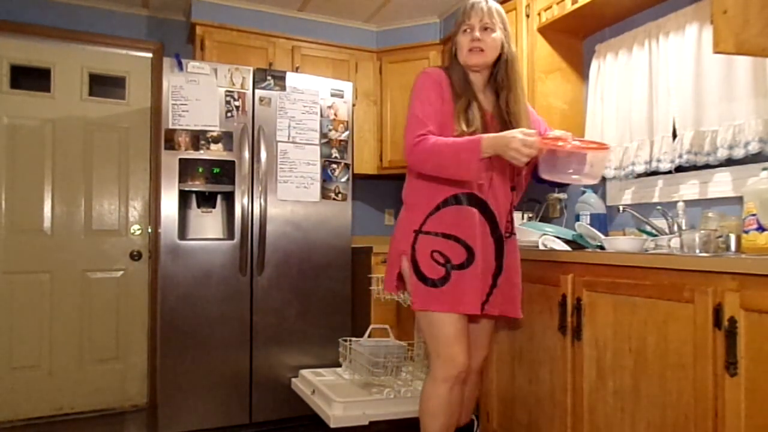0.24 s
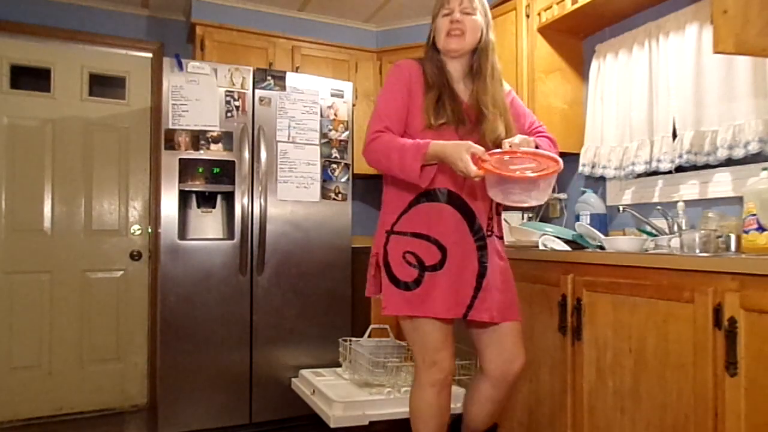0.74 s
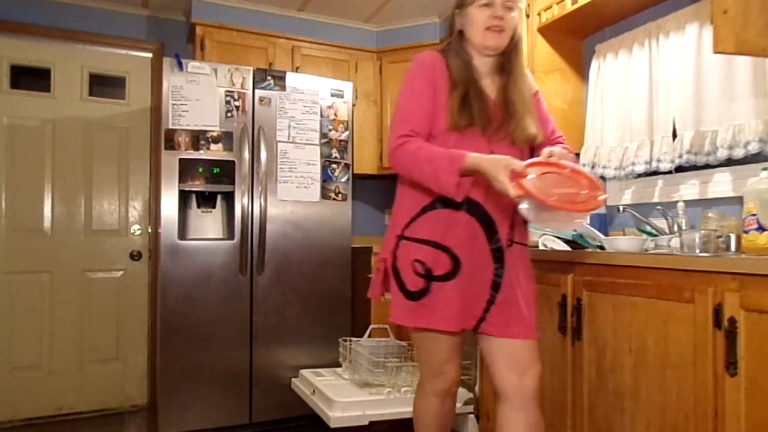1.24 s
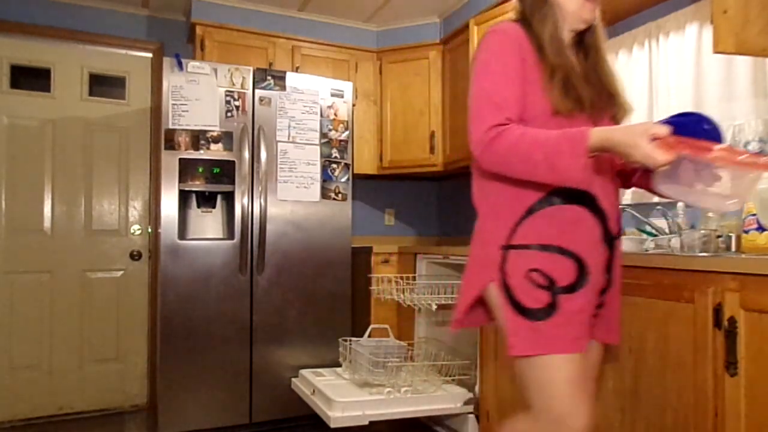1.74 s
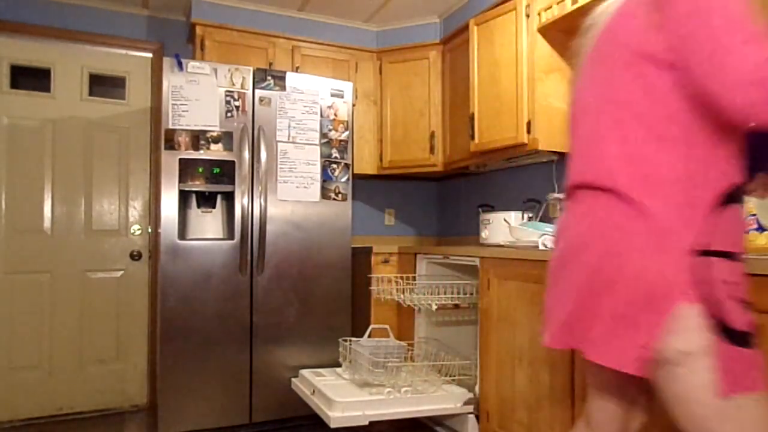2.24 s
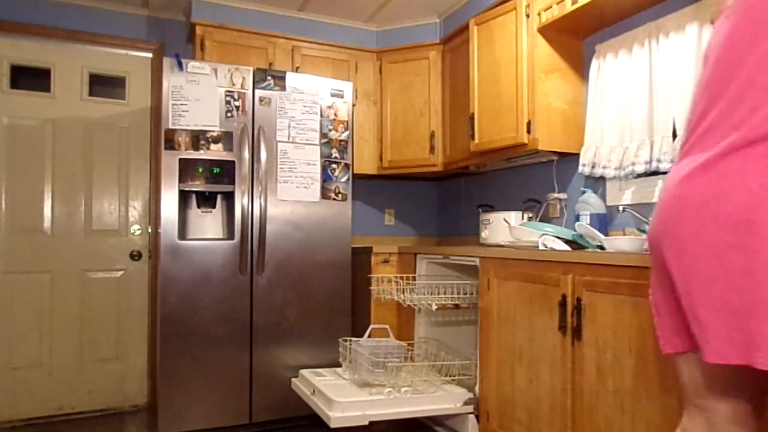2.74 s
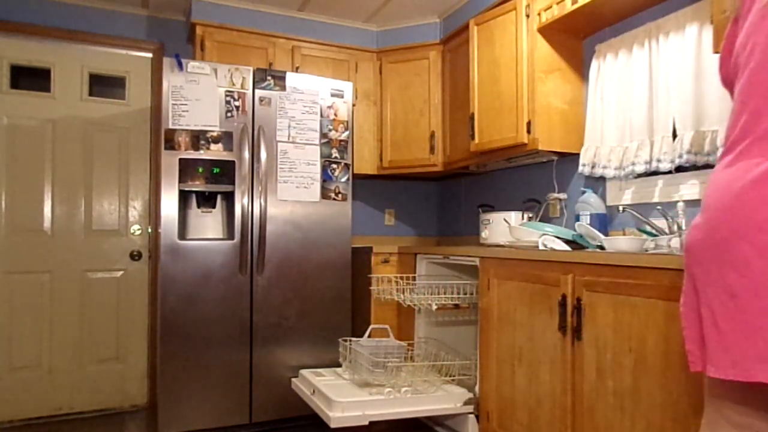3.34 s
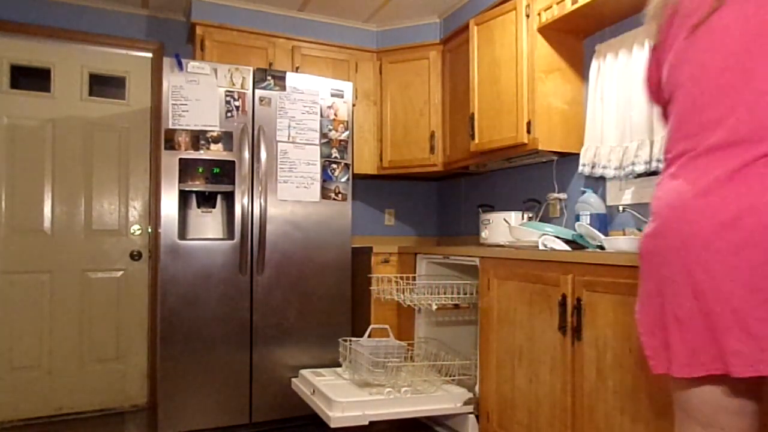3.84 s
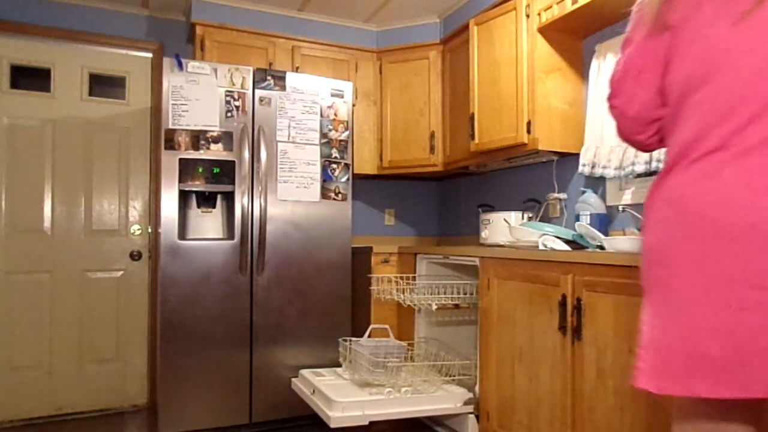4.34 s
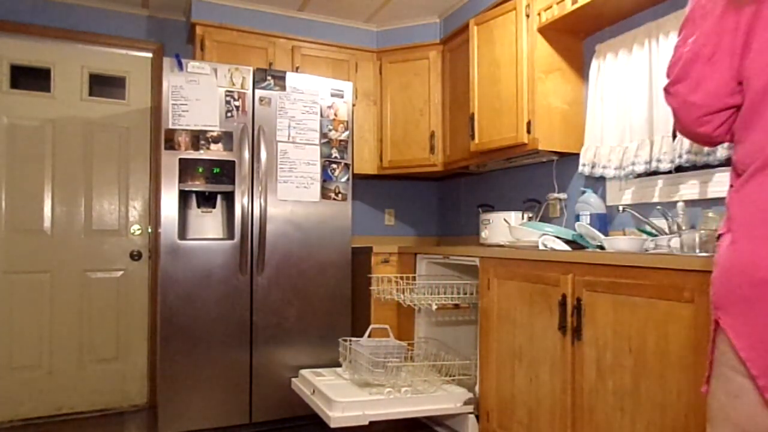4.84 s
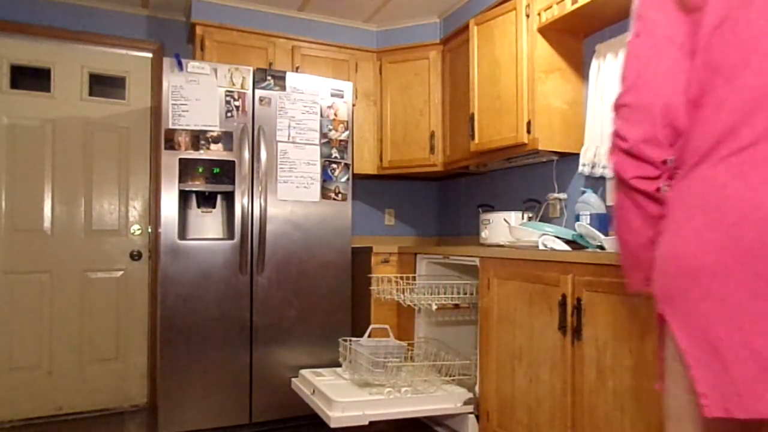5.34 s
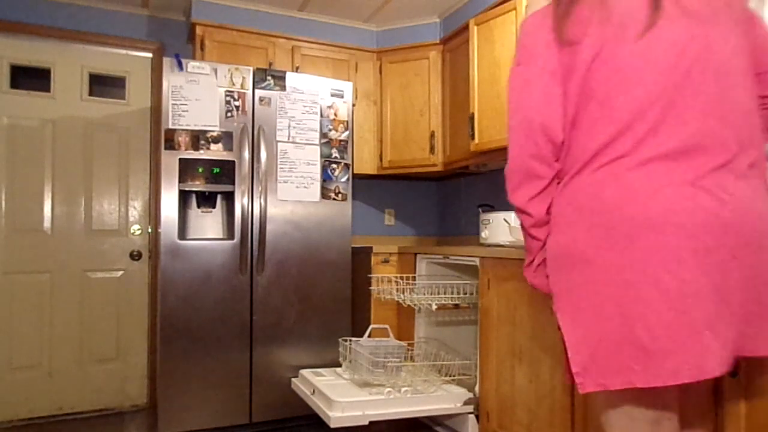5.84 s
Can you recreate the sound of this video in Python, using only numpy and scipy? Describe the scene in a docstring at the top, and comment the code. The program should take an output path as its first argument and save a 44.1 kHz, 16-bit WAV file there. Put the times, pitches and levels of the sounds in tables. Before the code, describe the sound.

Hollow plastic clatter and dull footsteps over appliance hum, a loud stacking thump, brief rattle, and two cupboard slams that leave glasses ringing.

```python
"""Plastic tubs and lids knock, rub, rattle and are stacked, amid footsteps and a latch pull; a wooden
cupboard door slams twice and glasses ring on. Behind is a steady appliance hum; the walls answer. Blows
are decaying noise bursts through resonances; glasses, thuds and door panel are decaying sines; rubs and
hum are shaped noise. A dull microphone picks it up, with preamplifier hiss and treble notches."""
import sys
import numpy as np
from scipy import signal
from scipy.fft import rfft, irfft, next_fast_len
from scipy.io import wavfile
from scipy.ndimage import uniform_filter1d, map_coordinates

SR = 44100
rng = np.random.default_rng(int(sys.argv[2]) if len(sys.argv) > 2 else 0)


def output_pcm(signal):
    """Save a mono or channel-first signal as 16-bit PCM at the path in sys.argv[1].

    Samples are clipped to [-1, 1] before scaling.
    """
    pcm = np.clip(np.atleast_2d(signal).T, -1, 1) * 32767
    wavfile.write(sys.argv[1], SR, np.round(pcm).astype(np.int16))


def volts_from_db(level):
    """Convert decibel levels to linear amplitude ratios."""
    exponent = np.asarray(level, float) / 20
    return 10 ** exponent


N = 268304

# The door meets its frame. Each row: time in seconds, blow level in dB, clack over body in dB,
# click over body in dB, body t60 in seconds.
DOOR_SLAMS = [(5.313, -1, -5.5, -2.5, 0.057), (5.579, -8.5, -3.5, -8, 0.036)]


def unit(x):
    """Scaled to rms 1."""
    return x / np.sqrt(np.mean(x ** 2) + 1e-20)


def along(points, hz):
    """(Hz, value) points read on a log frequency axis."""
    point_hz, value = np.transpose(points)
    return np.interp(np.log(hz + 1), np.log(point_hz + 1), value)


def filtered(x, response):
    """x times a complex response of frequency."""
    size = next_fast_len(x.shape[-1] + 8192)  # room for the filter to ring out
    spectrum = rfft(x, size) * response(np.fft.rfftfreq(size, 1 / SR))
    return irfft(spectrum, size)[..., :x.shape[-1]]


def band(f, hz, width_hz):
    """One causal resonance, gain 1 at its centre."""
    return 1j * f * width_hz / (hz * hz - f * f + 1j * f * width_hz)


def modes(f, table):
    """Resonances side by side, with alternating sign."""
    total = 0
    for k, (hz, width_hz, db) in enumerate(table):
        total = total + (-1) ** k * volts_from_db(db) * band(f, hz, abs(width_hz) + 1)
    return total


def add(out, start_s, x):
    """Mixes x in from a time that may lie before the start."""
    start = round(start_s * SR)
    x = x[max(-start, 0):]
    out[max(start, 0):][:len(x)] += x


def tail(length):
    """A new reverberant tail of energy 1, each frequency dying at its own speed."""
    # Wall reverberation. Each row: frequency in Hz, t60 in seconds.
    wall_t60 = [(80, 0.4), (300, 0.38), (1000, 0.32), (4000, 0.34), (8000, 0.22), (15000, 0.2)]
    hz, t, z = signal.stft(rng.standard_normal(length + 256), SR, nperseg=256)
    decay = volts_from_db(-60 * t / along(wall_t60, hz)[:, None])
    echo = signal.istft(z * decay, SR, nperseg=256)[1][:length]
    echo = echo * (1 - np.exp(-np.arange(length) / SR / 0.0046))
    return echo / np.linalg.norm(echo)


def walls(x, wet_db):
    """The sound with the answer of the walls."""
    return x + volts_from_db(wet_db) * signal.fftconvolve(x, tail(SR // 2))[:len(x)]


def blow(body, clack, clack_db, click_db, t60_s, rise_s):
    """A rattling contact drives the body's modes, a hard clack and a bright click; peak near 1."""
    crest_db = 16  # peak of a blow over the rms of its body sound
    t = np.arange(SR * 2 // 3) / SR
    click = lambda f: band(f, 2930, 5400) ** 2 + 0.29 * band(f, 7700, 7700)
    out, echo = np.zeros(len(t)), tail(len(t))
    parts = [(body, 0, t60_s), (clack, clack_db, 1.37 * t60_s), (click, click_db, 1.64 * t60_s)]
    for colour, db, life_s in parts:
        envelope = (1 - np.exp(-t / rise_s)) ** 2 * volts_from_db(-60 * t / life_s)
        near = filtered(rng.standard_normal(len(t)) * envelope, colour)
        near = near / np.sqrt(np.mean(near[:SR // 50] ** 2))
        # the walls return the same colour, blurred
        far = unit(filtered(echo, colour)) * (1 - np.exp(-t / (0.19 * life_s)))
        far = volts_from_db(-0.5) * np.sqrt(np.mean(near ** 2)) * far
        out += volts_from_db(db - crest_db) * (near + far)
    return out


def knocks():
    """Knocks of tubs and lids, with the latch pull and footsteps: each has a low hollow note and a harder
    upper note."""
    # Each row: time in seconds, blow level in dB, hollow note in Hz, upper note in Hz,
    # upper over hollow in dB.
    contacts = [(-0.004, -19, 558, 1360, -3), (0.056, -20, 600, 1420, -8), (0.089, -40.5, 540, 1350, 9),
                (0.312, -40, 620, 2300, -2), (0.521, -37.5, 600, 1300, 2), (0.654, -45.5, 810, 1350, 4.5),
                (0.677, -40, 318, 3150, 7), (1.231, -40, 433, 1260, 4), (2.091, -40.5, 1650, 3780, 9.5),
                (2.111, -28, 583, 1490, -15.5), (2.282, -41, 605, 1010, -3), (2.457, -44, 579, 2200, 12),
                (2.613, -29.5, 328, 1030, -12), (2.659, -39, 600, 1110, -14.5),
                (2.733, -22.5, 366, 1380, 8), (2.757, -20.5, 632, 1310, -21), (2.889, -38.5, 596, 1240, 0),
                (2.934, -41, 385, 1350, 1.5), (2.969, -36, 380, 1010, -1.5), (3.321, -41.5, 1070, 2980, 9),
                (3.546, -49.5, 810, 2430, 15.5), (3.563, -28, 936, 1610, 9),
                (3.572, -34.5, 1020, 2920, 3.5), (3.796, -31, 804, 2510, 8), (3.806, -32.5, 650, 1020, 0.5),
                (4.201, -46.5, 630, 2340, 10), (4.609, -39, 780, 2050, 8.5), (4.644, -28.5, 1200, 2130, 4),
                (4.678, -29, 473, 1530, 12.5), (4.784, -36.5, 430, 1230, 7.5), (4.899, -43, 790, 1240, -13),
                (5.015, -35, 696, 2460, 5), (5.039, -37.5, 308, 1770, 5), (6.055, -31.5, 318, 1130, -15)]
    # Bright click, duller near and inside the cupboard. Each row: time in seconds, dB over the hollow
    # note before the upper note's share.
    click_course = [(0, 5), (0.35, -8), (0.68, 2), (2.1, 5), (2.45, -8), (2.9, -20), (3.55, -8), (3.8, -22),
                    (4.6, -36), (5.05, -52), (6.05, -1.5)]
    click_follows_upper = 0.41  # dB per dB: a stronger upper note brings more click
    out = np.zeros(N + SR)
    for s, db, hollow_hz, upper_hz, upper_db in contacts + rattle():
        body = lambda f: (band(f, hollow_hz, 0.14 * hollow_hz)
                          + 0.3 * band(f, 0.82 * hollow_hz, 1.1 * hollow_hz) ** 2)
        upper = lambda f: band(f, upper_hz, 0.085 * upper_hz) + 0.35 * band(f, 1990, 1520) ** 2
        click_db = np.interp(s, *np.transpose(click_course)) + click_follows_upper * upper_db
        add(out, s - .003, volts_from_db(db) * blow(body, upper, upper_db, click_db, t60_s=0.04, rise_s=0.0033))
    return out[:N]


def rattle():
    """Lids pushed in rattle loosely: small uneven knocks of chance pitch, swelling, then dying away."""
    start_s, peak_s, end_s = 4.615, 4.69, 4.81
    level_db, swell_db, fade_db, scatter_db = -32, 6.5, 15, 2.5
    hollow_hz, upper_hz, upper_db = 515, 1564, 6.5
    detune = 0.33  # largest shift of pitch, natural log
    count = 11
    chance = rng.uniform(-1, 1, (count, 4))
    place = (np.arange(count) + .5 + .5 * chance[:, 0]) / count
    s = start_s + place * (end_s - start_s)
    db = level_db - np.interp(s, [start_s, peak_s, end_s], [swell_db, 0, fade_db])
    db = db + scatter_db * chance[:, 1]
    hollows_hz, uppers_hz = ([hollow_hz, upper_hz] * np.exp(detune * chance[:, 2:])).T
    return list(zip(s, db, hollows_hz, uppers_hz, np.full(count, upper_db)))


def struck(events, table, broad, rise_s):
    """Blows on one object: the same modes every time, plus a broad resonance."""
    out = np.zeros(N + SR)
    body = lambda f: modes(f, table) + broad * (band(f, 718, 680) + 0.15 * band(f, 2200, 1900))
    clack = lambda f: band(f, 1560, 1700) ** 2
    for s, db, clack_db, click_db, t60_s in events:
        add(out, s - .005, volts_from_db(db) * blow(body, clack, clack_db, click_db, t60_s, rise_s))
    return out[:N]


def stackings():
    """A stack of tubs set down on a shelf: blows excite the modes of the stack."""
    # Each row: time in seconds, blow level in dB, clack over body in dB, click over body in dB,
    # body t60 in seconds.
    landings = [(4.259, -0.5, -7, -30, 0.081), (4.291, -13.5, 5.5, -20.5, 0.067),
                (4.319, -21.5, -1.5, -12, 0.15), (4.377, -11, -8, -28, 0.11),
                (4.439, -26.5, -7, -35, 0.044)]
    # Stack modes. Each row: frequency in Hz, width in Hz (less 1), level in dB.
    stack_modes = [(318, 50, 4), (410, 60, 2), (620, 90, 5), (970, 90, 3), (1320, 190, -2), (1780, 100, -5),
                   (2520, 300, -5), (4070, 150, -8), (7100, 900, -22), (4830, 130, -10)]
    return struck(landings, stack_modes, broad=0.028, rise_s=0.0031)


def slams():
    """The door strikes its frame: blows excite the modes of the wood."""
    # Door modes. Each row: frequency in Hz, width in Hz (less 1), level in dB.
    door_modes = [(380, 65, -6), (642, 91, 6), (650, 170, -1.5), (1090, 30, -11), (1342, 27, -5),
                  (1770, 56, -31), (2480, 150, -14.5), (4150, 114, -6.5)]
    return struck(DOOR_SLAMS, door_modes, broad=0.42, rise_s=0.0032)


def panel():
    """Each slam sets the whole door swinging at its lowest notes."""
    # Low swings. Each row: frequency in Hz, dB relative to the slam, t60 in seconds, rise in seconds.
    swings = [(83.4, -9, 0.1, 0.0061), (144.8, -10, 0.17, 0.0069), (224, -7.5, 0.092, 0.0025)]
    out, t = np.zeros(N + SR), np.arange(SR // 2) / SR
    for s, db, *_ in DOOR_SLAMS:
        swing = np.zeros(len(t))
        for hz, level_db, t60_s, rise_s in swings:
            envelope = volts_from_db(level_db - 60 * t / t60_s) * (1 - np.exp(-t / rise_s))
            swing += envelope * np.sin(2 * np.pi * hz * t)
        add(out, s - .005, volts_from_db(db) * walls(-swing, wet_db=-4.5))
    return out[:N]


def glasses():
    """Each slam shakes the shelf: the glasses ring long, until the next jolt starts them afresh."""
    # Each row: frequency in Hz, first slam level in dB, second slam level in dB, t60 in seconds.
    ringing = [(672, -40.5, -45, 1.46), (1125, -41, -48, 5), (1444, -42, -47.5, 1.9), (1670, -35, -55, 1.5)]
    out, t = np.zeros(N + SR), np.arange(SR) / SR
    for k, slam in enumerate(DOOR_SLAMS):
        ring = np.zeros(len(t))
        for hz, *levels_db, t60_s in ringing:
            ring += volts_from_db(levels_db[k] - 60 * t / t60_s) * np.sin(2 * np.pi * hz * t)
        out[round(slam[0] * SR):][:SR] = ring * (1 - np.exp(-t / 0.0041))  # replaces the older ring
    return out[:N]


def rubs():
    """Plastic slides on plastic: dense uneven grains that swell with the stroke and stop quickly."""
    # Sliding strokes. Each row: start in seconds, fastest in seconds, level in dB before smoothing,
    # swell in dB.
    strokes = [(0.63, 0.674, -58, 18), (1.12, 1.226, -39, 19), (2.844, 2.955, -54, 5),
               (5.01, 5.043, -51, 2.5)]
    # Rubbing spectrum. Each row: frequency in Hz, relative density in dB per Hz.
    rub_spectrum = [(60, -55), (150, -18), (430, -7), (560, -14.5), (810, -10.5), (1000, -24),
                    (1290, -11.5), (2000, -18), (3500, -20), (4700, -20), (5500, -19), (8000, -26),
                    (15500, -23), (20000, -80)]
    fade_db_per_s = 400
    t, stroke = np.arange(N) / SR, np.zeros(N)
    for start_s, fastest_s, db, swell_db in strokes:
        rising_db = swell_db * (fastest_s - t) / (fastest_s - start_s)
        drop_db = np.maximum(rising_db, fade_db_per_s * (t - fastest_s))
        stroke += volts_from_db(db - drop_db) * (t > start_s)
    grip_db = 2.1 * map_coordinates(rng.standard_normal(N // 300 + 4), [np.arange(N) / 300])
    uneven = unit(volts_from_db(grip_db) * rng.standard_normal(N))
    grains = unit(filtered(uneven, lambda f: volts_from_db(along(rub_spectrum, f))))
    return walls(uniform_filter1d(stroke, size=300) * grains, wet_db=-5.0)


def thuds():
    """Dull thuds of heels, shelf and door panel: a soft push sets one low note swinging."""
    # Each row: time in seconds, swing level in dB, pitch in Hz.
    pushes = [(0.668, -48.5, 163), (1.126, -38, 300), (1.159, -39, 165), (1.169, -48, 56.5),
              (2.11, -32, 186), (2.113, -32, 79), (2.159, -39.5, 87), (2.286, -46.5, 183),
              (2.614, -35.5, 113), (2.734, -25, 184), (2.759, -20.5, 221), (2.789, -25, 231),
              (2.932, -38.5, 221), (3.307, -46.5, 122), (4.254, -11.5, 233), (4.376, -16, 196),
              (4.44, -26.5, 200), (4.674, -31, 215), (4.685, -40.5, 109), (4.783, -38.5, 132),
              (4.919, -44, 94.2), (5.03, -38.5, 188), (5.348, -16, 223), (5.609, -24, 152),
              (5.721, -30, 107), (5.945, -42.5, 104), (6.054, -36, 177)]
    base_t60_s, extra_cycles = 0.048, 5.9  # t60 is the base plus a few of the thud's own cycles
    out, t = np.zeros(N + SR), np.arange(SR // 2) / SR
    for s, db, hz in pushes:
        decay = volts_from_db(-60 * t / (base_t60_s + extra_cycles / hz))
        overtone = 0.36 * np.sin(2 * np.pi * 1.55 * hz * t) * decay  # dies twice as fast
        swing = (np.sin(2 * np.pi * hz * t) + overtone) * decay * (1 - np.exp(-t / 0.0016))
        add(out, s - .003, volts_from_db(db) * walls(swing, wet_db=-4))
    return out[:N]


def hum():
    """Refrigerator and air: steady noise with faint patches in time and frequency."""
    # Hum spectrum. Each row: frequency in Hz, relative density in dB per Hz.
    hum_spectrum = [(15, -47), (25, -9), (65, -10.5), (97, -3.5), (118, -4.5), (213, -5.5), (332, -6),
                    (366, -9.5), (446, -14.5), (571, -8.5), (678, -10), (846, -14.5), (957, -12.5),
                    (2630, -10.5), (9000, -29.5), (11700, -64), (19800, -120)]
    z = signal.stft(rng.standard_normal(N + 512), nperseg=512)[2]
    field = uniform_filter1d(rng.standard_normal(z.shape), size=6, axis=0)
    field = uniform_filter1d(field, size=12, axis=1)
    patchy = signal.istft(z * volts_from_db(1.1 * unit(field)), nperseg=512)[1][:N]
    return volts_from_db(-54.5) * unit(filtered(patchy, lambda f: volts_from_db(along(hum_spectrum, f))))


def kitchen(x):
    """The low modes of the room add to the direct sound."""
    # Room modes. Each row: frequency in Hz, width in Hz, level in dB.
    room_modes = [(281.4, 34, 1), (406, 106, 1.5), (600, 40.5, 5), (810, 98, 5.5), (1064, 140, -1.5)]
    return filtered(x, lambda f: 1.0 + sum(volts_from_db(db) * band(f, hz, width_hz) for hz, width_hz, db in room_modes))


def scene():
    """Blows, rubs and hum coloured by the room modes; thuds, panel and glasses added directly."""
    coloured = kitchen(knocks() + stackings() + slams() + rubs() + hum())
    return (coloured + thuds() + panel() + glasses())[None]


def top_cut(x):
    """Nothing passes above the cut-off."""
    return signal.sosfilt(signal.butter(12, 16220, fs=SR, output="sos"), x)


def record(dry):
    """A dull microphone lacking deep bass, preamplifier hiss, treble notches, some narrow and some broad."""
    # Preamplifier noise. Each row: frequency in Hz, gain in dB on white noise of rms 1.
    hiss_gain = [(3000, -75.5), (8000, -79.5), (12000, -67.5), (15700, -68)]
    # Treble notches. Each row: frequency in Hz, width in Hz, depth from 0 to 1.
    notch_rows = [(3655, 158, .95), (4430, 230, .95), (7945, 970, 1), (10220, 770, 0.54),
                  (11820, 2960, 0.88)]
    bass_hz, top_hz = 40, 6100  # corners of three low-cut and two high-cut poles
    mic = filtered(dry, lambda f: (1j * f / (bass_hz + 1j * f)) ** 3 / (1 + 1j * f / top_hz) ** 2)
    mic = mic + filtered(rng.standard_normal(N), lambda f: volts_from_db(along(hiss_gain, f)) * (f > 2000))
    notches = lambda f: np.prod([1 - min(depth, 1) * band(f, hz, width_hz)
                                 for hz, width_hz, depth in notch_rows], axis=0)
    mix = np.clip(filtered(mic, notches), -1, 1)
    return top_cut(mix)


dry = scene()
out = record(dry)
output_pcm(out)
```